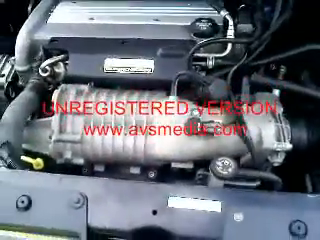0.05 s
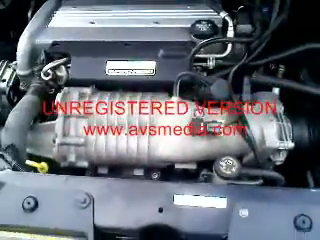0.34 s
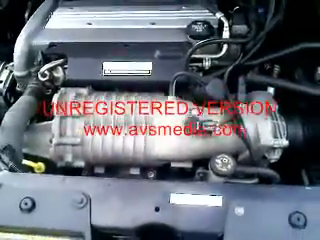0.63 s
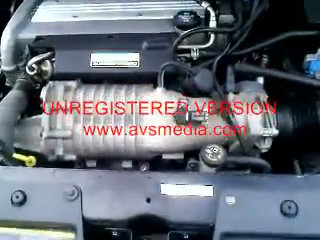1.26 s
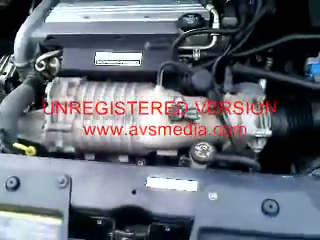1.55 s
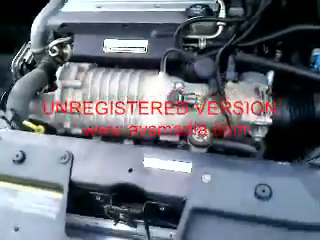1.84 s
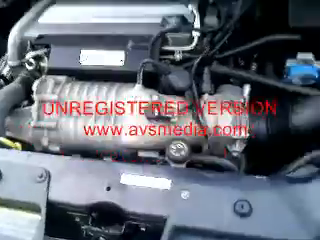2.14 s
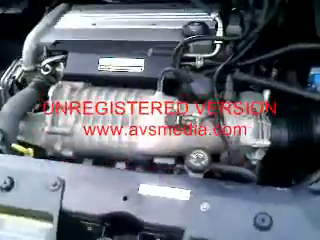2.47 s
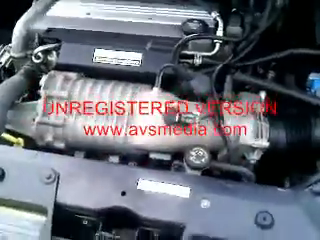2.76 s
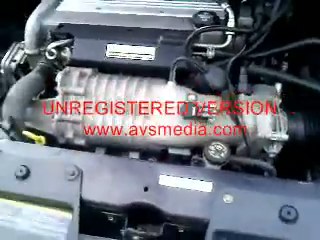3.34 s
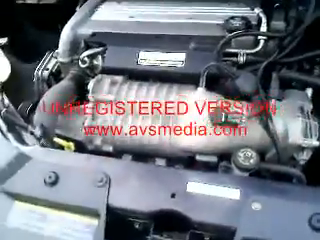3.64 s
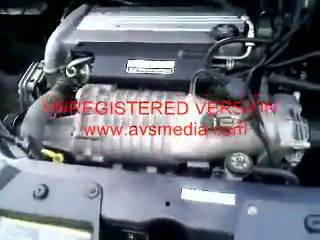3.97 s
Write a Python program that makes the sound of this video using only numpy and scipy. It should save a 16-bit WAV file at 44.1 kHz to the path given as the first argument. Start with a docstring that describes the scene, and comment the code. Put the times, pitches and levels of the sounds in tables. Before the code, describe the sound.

A supercharged car engine revs twice with a whine, then sinks towards idle.

```python
"""A supercharged four-cylinder engine runs in its open bay, heard from above: crank harmonics sound over
dense valve and chain clatter, a low rumble and a faint hum. The throttle is blipped twice, and each time
the blower whines as it and the harmonics sweep through the resonances of duct and casing. Halfway there
is one faint tick, and the engine sinks towards idle. Its sound, taken in by a small microphone,
has little bass and no high treble."""
import sys
import numpy as np
from scipy import signal
from scipy.fft import rfft, irfft
from scipy.io import wavfile
from scipy.ndimage import uniform_filter1d

SR = 44100
rng = np.random.default_rng(int(sys.argv[2]) if len(sys.argv) > 2 else 0)


def wrap_up_sound(samples):
    """Save the sound to the file named by the first command line argument, as 16-bit audio."""
    columns = np.atleast_2d(samples).T
    # keep every value between -1 and 1, then stretch to whole-number steps
    tamed = np.clip(columns, -1, 1)
    steps = np.round(tamed * 32767).astype(np.int16)
    wavfile.write(sys.argv[1], SR, steps)


N = 176400
TIME = np.arange(N) / SR

# The two blips of the throttle. Each row: time in seconds, opening from 0 to 1.
THROTTLE_OPENING = [(0, .05), (.12, .1), (.18, .7), (.26, .9), (.38, 1), (.47, .9), (.53, .25), (.8, .05),
                    (.96, .2), (1.07, .75), (1.2, .6), (1.28, .7), (1.42, .05), (1.7, 0)]


def undb(db):
    """Amplitude ratio of a level in decibels."""
    return 10 ** (np.asarray(db) / 20)


def curve(table, column=1):
    """Linear interpolation in time of one column of a table."""
    rows = np.array(table, float)
    return np.interp(TIME, rows[:, 0], rows[:, column])


def response(points, hz):
    """Frequency response as a gain, interpolated in decibels over log frequency."""
    rows = np.array(points, float)
    return undb(np.interp(np.log(np.maximum(hz, 1)), np.log(rows[:, 0]), rows[:, 1]))


def unit(x):
    """Normalisation to an rms of 1."""
    return x / np.sqrt(np.mean(x ** 2))


def colour(x, points):
    """Minimum-phase filtering by a spectrum, falling 12 dB an octave below its first point; rms 1."""
    hz = np.maximum(np.arange(N // 2 + 1) * SR / N, 1)
    gain = response(points, hz) * np.minimum(hz / points[0][0], 1) ** 2
    cepstrum = irfft(np.log(gain), N)
    cepstrum[1:N // 2] *= 2  # folding the cepstrum makes the filter causal
    cepstrum[N // 2 + 1:] = 0
    return unit(irfft(rfft(x) * np.exp(rfft(cepstrum)), N))


def walk(rate):
    """Random modulation that takes a new direction rate times a second; rms 1."""
    knots = rng.standard_normal(2048)
    return unit(np.interp(TIME * rate, np.arange(len(knots)), knots))


def partials(lines, speed, body, level_db=0):
    """Forced vibration: lines locked to the crank drive a body; some resonate at critical speeds."""
    # Critical speeds. Each row: harmonic number, crank speed and half-width in turns per second,
    # peak level in dB with the throttle shut.
    critical_speeds = [(8, 109, 5, -37), (9, 66, 5, -35.5), (12, 101.5, 5, -30), (14, 90, 3.5, -30),
                       (14, 102, 4, -35), (16, 80.5, 3, -25.5), (16, 92.5, 3, -29), (18, 67.5, 2, -32),
                       (18, 75, 2.5, -27), (18, 81.5, 1.8, -27), (18, 89.5, 2, -31), (20, 104, 2.5, -32),
                       (22, 87, 2.5, -28), (22, 97.7, 1.5, -30), (23, 82, 4, -34), (24, 89.6, 2.5, -29),
                       (27, 68, 2, -33), (30, 70, 2, -34)]
    flutter_db, flutter_per_s, wobble_rad = 1.5, 35, .22
    crank_angle = 2 * np.pi * np.cumsum(speed) / SR
    coasting = 1 - np.clip(curve(THROTTLE_OPENING), 0, 1)
    out = 0
    for multiple, db in lines:
        swell = sum(undb(peak_db) * np.exp(-.5 * ((speed - centre) / width) ** 2)
                    for harmonic, centre, width, peak_db in critical_speeds if harmonic == multiple)
        forced = undb(db + level_db) * response(body, multiple * speed)
        flutter = undb(flutter_db * walk(flutter_per_s))
        amplitude = np.sqrt(2) * np.maximum(forced, swell * coasting) * flutter
        phase = multiple * crank_angle + wobble_rad * walk(flutter_per_s) + rng.uniform(0, 2 * np.pi)
        out = out + amplitude * np.sin(phase)
    return out


def engine(speed):
    """Periodic excitation: the crank's harmonics, even ones strongest, sweep the casing's resonances."""
    # Crank harmonics from the second upward. Each entry: relative level in dB.
    harmonics_db = [-21.5, -31.5, -35, -37, -29.5, -37.5, -29, -30.5, -34, -33, -26, -55, -25.5, -35.5,
                    -30.5, -40.5, -25, -37.5, -32, -31, -22.5, -26.5, -21.5, -31, -32.5, -35.5, -25.5,
                    -37.5, -22.5, -40.5, -30.5, -41, -42]
    # Response of casing and bay. Each row: frequency in Hz, gain in dB.
    casing_response = [(90, -51.5), (140, -38.5), (205, -32), (310, -19), (430, -24.5), (510, -15.5),
                       (600, -7), (690, -7.5), (860, -6), (1000, -6), (1130, -11.5), (1225, 2), (1340, -5),
                       (1480, -0.5), (1560, -10.5), (1640, -1), (1740, -9.5), (1910, -0.5), (2020, -4),
                       (2130, -6.7), (2400, -8.5), (2700, -18.5), (3300, -16), (4200, -27.5)]
    # Envelope of the harmonics. Each row: time in seconds, gain in dB.
    envelope = [(0, -5.5), (.15, -6.5), (.35, -8.5), (.55, -2.5), (.75, -1), (.95, -2.5), (1.15, -8),
                (1.45, -1.5), (1.7, -3), (1.9, 0.5), (2.1, -2), (2.3, -2.5), (2.55, -6.5), (2.9, -14.5),
                (3.4, -21.5), (4, -24.5)]
    return partials(enumerate(harmonics_db, 2), speed, casing_response, curve(envelope))


def valve_taps(speed, per_turn=4):
    """Impact excitation: uneven valve taps, each a decaying noise burst, stronger at low speed."""
    # The four taps of one crank turn. Each entry: relative level in dB.
    accents_db = [9, -2, 2.5, 1]
    level_db, db_per_halving, scatter_db, decay_s = -8.5, 5, 1.5, .002
    tap_phase = np.cumsum(speed) * per_turn / SR
    tap = tap_phase.astype(int)
    strength = undb(np.array(accents_db)[tap % per_turn] + scatter_db * rng.standard_normal(N)[tap])
    age_s = (tap_phase % 1) / (per_turn * speed)
    bursts = strength * np.exp(-age_s / decay_s) * rng.standard_normal(N)
    return unit(bursts) * undb(level_db - db_per_halving * np.log2(speed / speed.mean()))


def machinery(speed):
    """Broadband excitation: taps and the steady rush of chain, belt and air ring the casing."""
    # Spectra of the clatter and of the hiss above it. Each row: frequency in Hz, relative level in dB.
    clatter_spectrum = [(250, -44.5), (400, -22.5), (480, -17.5), (600, -13.5), (750, -8), (950, -5),
                        (1120, -2), (1215, 0.5), (1330, -1.5), (1600, 0), (1850, -2), (2100, 2.5),
                        (2300, -5.5), (2500, -7), (2900, -22), (3600, -48)]
    hiss_spectrum = [(1500, -17), (2400, -2), (2750, -2), (3200, -1.5), (3550, -4.5), (3900, -11.5),
                     (4150, -20), (4400, -33)]
    # Their envelopes. Each row: time in seconds, clatter gain in dB, hiss gain in dB.
    envelopes = [(0, -21, -33), (.42, -23.5, -31.5), (.7, -21.5, -31.5), (1.18, -19.5, -31),
                 (1.5, -21.5, -31), (2, -21, -34), (2.4, -22, -30), (2.75, -19.5, -40.5),
                 (2.95, -23, -37.5), (3.28, -25.5, -40.5), (3.45, -27.5, -41.5), (4, -29.5, -47)]
    clatter = colour(valve_taps(speed) + rng.standard_normal(N), clatter_spectrum)
    hiss = colour(valve_taps(speed) + rng.standard_normal(N), hiss_spectrum)
    return clatter * undb(curve(envelopes) - 1) + hiss * undb(curve(envelopes, column=2) + 1.5)


def rumble(speed):
    """A power law: the amplitude of a low band of noise grows in proportion to crank speed."""
    # Spectrum of the rumble. Each row: frequency in Hz, relative level in dB.
    spectrum = [(70, -48), (85, -27.5), (110, -18), (170, -10.5), (220, -2.5), (380, 4), (500, -2.5),
                (800, -20.5)]
    level_db = -55 + 6 * np.log2(speed / 100)
    return colour(rng.standard_normal(N), spectrum) * undb(level_db)


# The one strong resonance of the blower housing. Each row: frequency in Hz, gain in dB.
HOUSING_RESPONSE = [(1500, -39), (1900, -15), (2030, -4.5), (2110, 4.5), (2190, -2.5), (2320, -17),
                    (2800, -40.5)]


def housing(speed):
    """Resonance: taps and rushing air keep the blower housing ringing near 2.1 kHz."""
    # Envelope of the ringing. Each row: time in seconds, gain in dB.
    envelope = [(0, -26), (1.1, -28.5), (1.7, -26), (2.15, -49), (2.7, -33), (3.27, -27), (3.42, -36.5),
                (4, -48)]
    excitation = valve_taps(speed) + rng.standard_normal(N)
    return colour(excitation, HOUSING_RESPONSE) * undb(curve(envelope))


def hum(hz=554.5, level_db=-53):
    """A faint steady tone with slight phase modulation, as of an electric fan."""
    return np.sqrt(2) * undb(level_db) * np.sin(2 * np.pi * hz * TIME + .5 * walk(8.3))


def supercharger(speed):
    """Lobe-passing tones whine with the throttle open; belt tones flare at the housing's resonance."""
    # Whine of the rotor lobes. Each row: multiple of rotor speed, relative level in dB.
    lobe_lines = [(3, -32), (6, -27), (12, -26), (18, -35)]
    # Response of the intake duct. Each row: frequency in Hz, gain in dB.
    duct_response = [(400, -42), (620, -9), (720, -9.5), (790, 0.5), (850, -19), (910, -1), (980, -17.5),
                     (1060, 0.5), (1200, 3), (1400, -14), (1580, 5.5), (1750, -8), (2050, -3.5),
                     (2280, -8.5), (2500, -15), (3300, 3.5), (4200, -34)]
    # Tones of the belt drive. Each row: multiple of crank speed, relative level in dB.
    belt_lines = [(18.65, -24), (28.4, -20)]
    drive_ratio, rasp_db, rasp_per_s = 1.843, 3, 70
    rotors = partials([(k * drive_ratio, db) for k, db in lobe_lines], speed, duct_response)
    belt = partials(belt_lines, speed, HOUSING_RESPONSE)
    return (rotors + belt) * curve(THROTTLE_OPENING) * undb(rasp_db * walk(rasp_per_s))


def tick(start_s=2.021):
    """A single impulse has a flat spectrum and is heard as a faint, bright tick."""
    return undb(-18) * (np.arange(N) == int(start_s * SR))


def scene():
    """Superposition: one slightly unsteady crank drives all but the hum; the noise surges a little."""
    # Rotation of the crank. Each row: time in seconds, speed in turns per second.
    crank_speed = [(0.0, 75.66), (0.21, 70.62), (0.26, 75.03), (0.33, 85.27), (0.51, 112.48),
                   (0.56, 114.01), (0.67, 106.43), (0.8, 102.21), (0.98, 97.69), (1.1, 92.73), (1.15, 95.6),
                   (1.26, 111.36), (1.3, 113.07), (1.4, 107.22), (1.56, 100.39), (1.78, 95.24), (2.0, 85.4),
                   (2.15, 78.92), (2.35, 71.85), (2.6, 63.79), (2.9, 53.17), (3.2, 43.96), (3.6, 35.01),
                   (4.0, 29.0)]
    surge_db, surge_per_s = .7, 14
    speed = uniform_filter1d(curve(crank_speed), size=900, mode="nearest") * (1 + .001 * walk(30))
    noise = (machinery(speed) + rumble(speed) + housing(speed)) * undb(surge_db * walk(surge_per_s))
    return (engine(speed) + supercharger(speed) + noise + hum())[None]


def record(dry):
    """Limiting and low-pass filtering narrow the engine's sound; the tick keeps a wider band."""
    threshold_db, window = -15.5, int(.005 * SR)
    engine_band_hz, tick_band_hz = 4355, 16000
    rms = np.sqrt(np.abs(uniform_filter1d(dry ** 2, window)))
    limited = dry * uniform_filter1d(1 / np.maximum(rms / undb(threshold_db), 1), window)
    narrow = signal.sosfilt(signal.ellip(10, .2, 80, engine_band_hz, fs=SR, output="sos"), limited)
    return signal.sosfilt(signal.ellip(8, .2, 70, tick_band_hz, fs=SR, output="sos"), narrow + tick())


dry = scene()
out = record(dry)
wrap_up_sound(out)
```